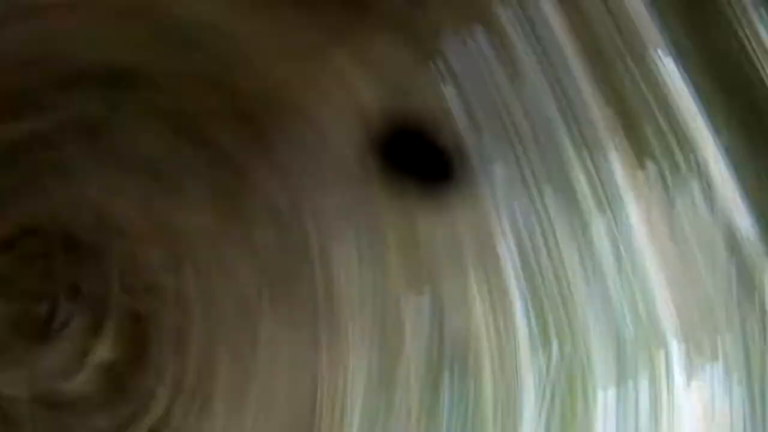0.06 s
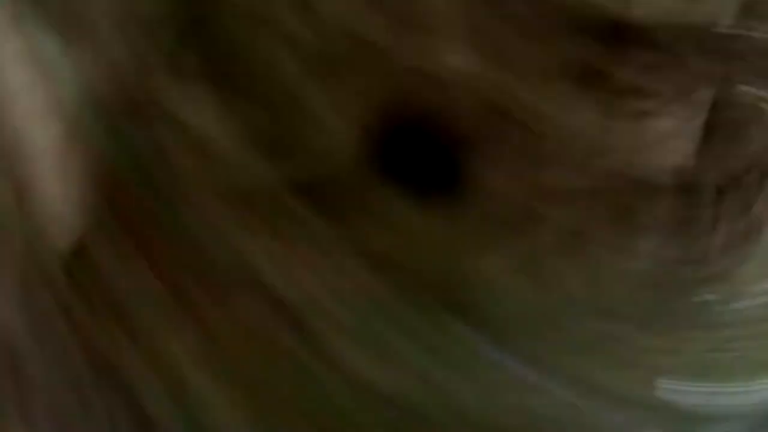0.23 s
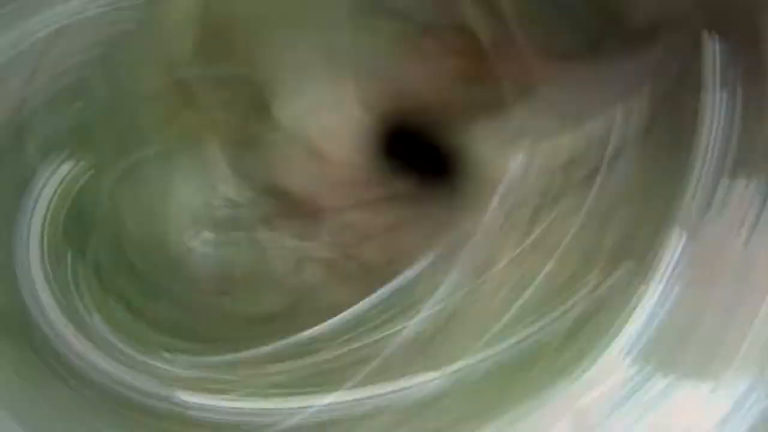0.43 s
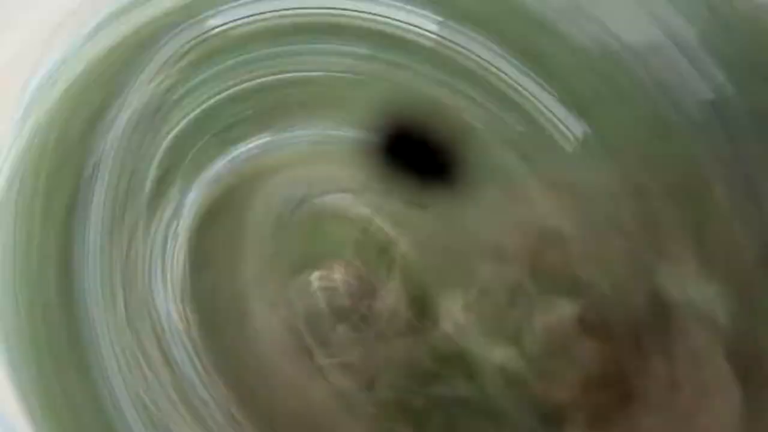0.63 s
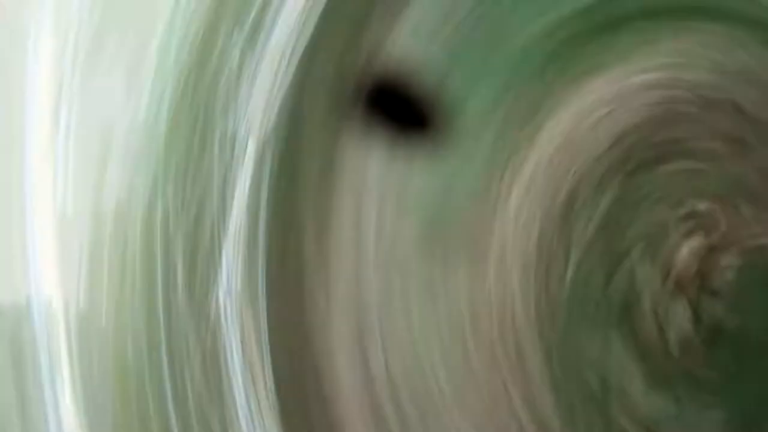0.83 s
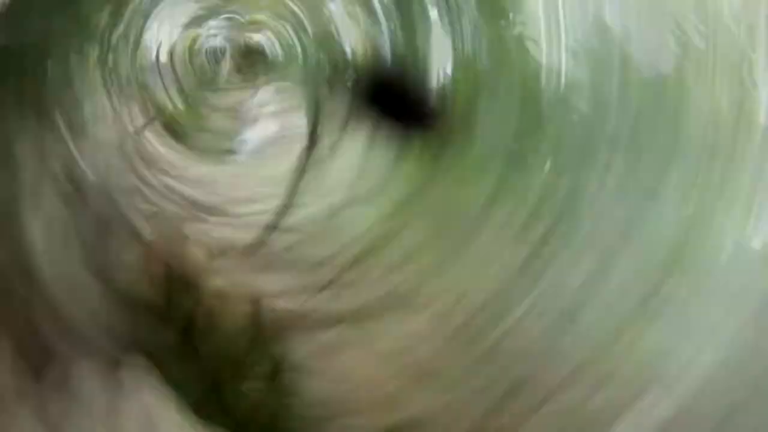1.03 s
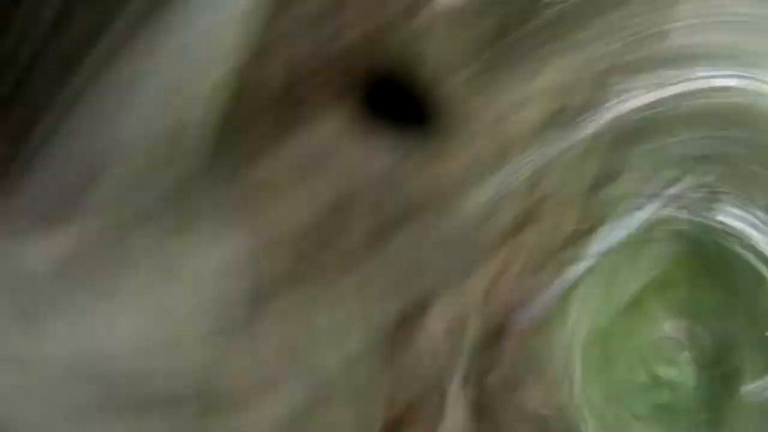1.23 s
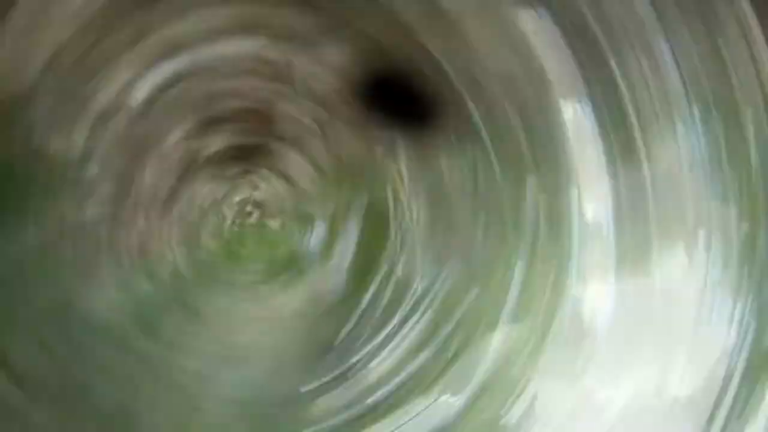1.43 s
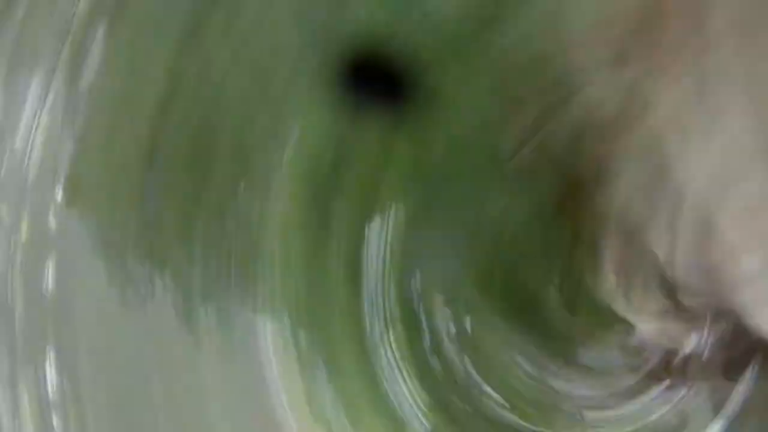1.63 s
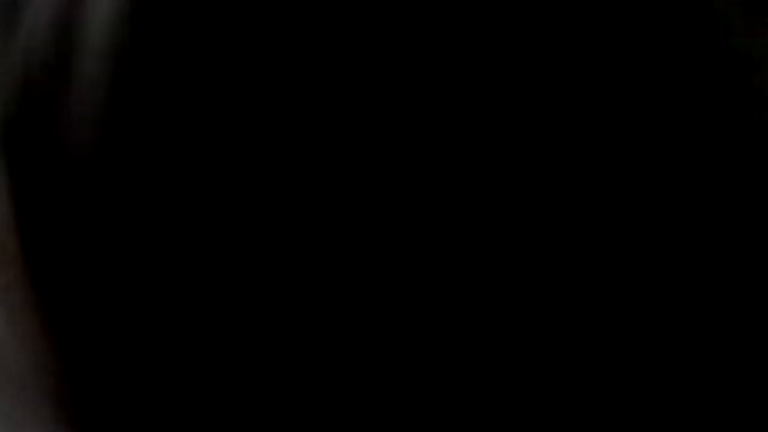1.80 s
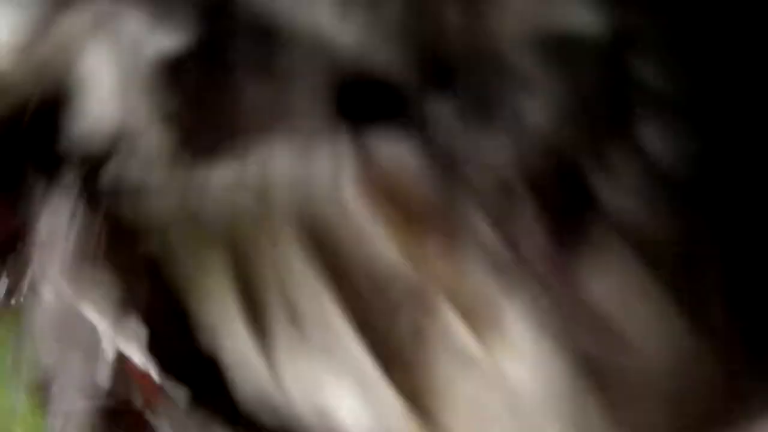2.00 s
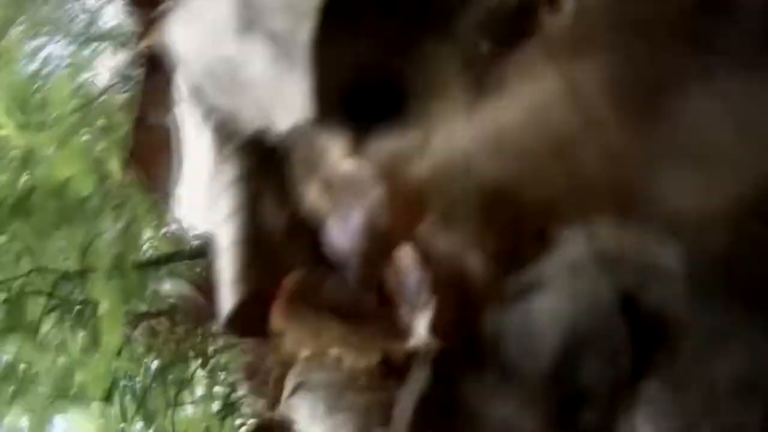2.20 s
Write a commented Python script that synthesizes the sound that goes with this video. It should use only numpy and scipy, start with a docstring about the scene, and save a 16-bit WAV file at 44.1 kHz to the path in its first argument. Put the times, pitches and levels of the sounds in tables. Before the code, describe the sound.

A small camera tumbles over dry leaves and soil, heard from its own microphone. Clusters of sharp knocks, gritty scrapes and dull thumps hit around 0.25, 0.5, 0.7 and 1 seconds, lighter near 1.25, then hard again from 1.5 to 1.7, the loudest overloading. Between them the case rings faintly and air rushes softly. From 1.8 it slides through rustling leaves, knocks twice and settles by 2.3 seconds.

```python
"""A slope of dry leaves in a quiet wood, heard from the built-in microphone of a small tumbling camera.
Each landing is right at the microphone: sharp knocks on the case, a gritty scrape and a dull thump
of earth, the hardest overloading the input. In flight the case rings faintly and air rushes softly past.
At last the camera slides through the leaf litter and settles."""
import sys
import numpy as np
from scipy import signal
from scipy.fft import rfft, irfft, next_fast_len
from scipy.io import wavfile

SR = 44100
rng = np.random.default_rng(int(sys.argv[2]) if len(sys.argv) > 2 else 0)


def store_wav(level_fs):
    """Save 16-bit WAV to argv[1]."""
    pcm = np.round(np.clip(np.atleast_2d(level_fs), -1, 1) * 32767)
    wavfile.write(sys.argv[1], SR, pcm.T.astype(np.int16))


N = 103635


def undb(db):
    """Decibels to gain."""
    return 10 ** (np.asarray(db) / 20)


def unit(x):
    """Scale to rms 1."""
    return x / np.sqrt(np.mean(x ** 2) + 1e-18)


def colour(x, outline):
    """Minimum-phase filter following an outline of frequency_hz, gain_db."""
    hz, db = np.array(outline, float).T
    size = next_fast_len(len(x) + 4096, real=True) // 2 * 2
    bins_hz = np.maximum(np.fft.rfftfreq(size, 1 / SR), 1)
    gain = undb(np.interp(np.log(bins_hz), np.log(hz), db))
    cepstrum = irfft(np.log(gain), size)
    cepstrum[1:size // 2] *= 2
    cepstrum[size // 2 + 1:] = 0
    return irfft(rfft(x, size) * np.exp(rfft(cepstrum)), size)[:len(x)]


def add(out, start_s, x):
    """Mix a sound in at a time."""
    i = int(start_s * SR)
    out[i:i + len(x)] += x[:N - i]


def fade(t, t60_s):
    """Exponential decay by 60 dB in t60_s."""
    return np.exp(-np.log(1000) * t / t60_s)


# Air at the microphone, the quiet wood behind it: frequency_hz, gain_db
AIR_SPECTRUM = [(20, 10), (45, -8), (110, -19.5), (300, -23.5), (480, -21.5), (900, -31.5), (2200, -24.5),
                (3200, -34), (5500, -33.5), (10000, -43.5), (16000, -59)]
# Its rise and fall: time_s, level_db
AIR_LEVELS = [(0, -40.5), (.2, -39), (.42, -51.5), (0.799, -51), (1.15, -48.5), (1.4, -55), (2.35, -50)]

def air():
    """Air rushes softly past the microphone of the flying camera."""
    level_db = np.interp(np.arange(N) / SR, *np.array(AIR_LEVELS).T)
    return undb(level_db) * unit(colour(rng.standard_normal(N), AIR_SPECTRUM))


# Lightly damped modes of the case around the microphone: pitch_hz, gain_db, t60_s
CASE_MODES = [(474,4.5,0.4), (684,-6.5,0.35), (860,-4,.18), (1450,-27.5,.5), (1787,-20,.35),
              (2158,-22.5,0.82), (2627,-14.5,.22), (3548,-20.5,.2), (4420,-24,.3)]
# Contacts that leave it ringing: start_s, level_db, favoured_hz
RING_CONTACTS = [(.33,-34.5,2140), (.69,-28,1193), (1.042,-49.5,494), (1.504,-30.5,480), (1.5771,-31.5,480)]

def case_ring(falloff_db_per_octave=9):
    """The case rings on in flight; modes near the pitch that the struck spot favours speak most."""
    out, t = np.zeros(N), np.arange(SR // 2) / SR
    for start_s, level_db, favoured_hz in RING_CONTACTS:
        for pitch_hz, gain_db, t60_s in CASE_MODES:
            octaves_off = abs(np.log2(pitch_hz / favoured_hz))
            gain = undb(level_db + gain_db - falloff_db_per_octave * octaves_off)
            add(out, start_s, gain * fade(t, t60_s) * np.sin(2 * np.pi * pitch_hz * t))
    return out


def grit(band_catches_per_s=1600, spread_db=2.9, smooth_gain=.6):
    """Dense tiny catches of uneven size, each in its own half-octave band, over a smooth rub."""
    grains = 0
    for low_hz in 750 * 2 ** np.arange(0, 4, .5):
        size = undb(spread_db * np.minimum(rng.exponential(size=N), 5))
        catches = (rng.random(N) < band_catches_per_s / SR) * size * rng.standard_normal(N)
        band = signal.butter(2, [low_hz, low_hz * np.sqrt(2)], "band", fs=SR, output="sos")
        grains = grains + signal.sosfilt(band, catches)
    return unit(unit(grains) + smooth_gain * rng.standard_normal(N))


# Scrapes over leaves and soil, rising and falling by 20 dB in the times given:
# peak_s, rise_s, fall_s, level_db, leaf_relative_db
SCRAPE_CONTACTS = [(0.262, 0.013, 0.022, -15, -27), (.309, 0.0094, 0.013, -20, -37),
                   (.328, 0.0077, 0.027, -30, -6.5), (0.361, 0.009, 0.026, -26.5, -14),
                   (0.473, 0.011, 0.014, -17.5, -8), (0.5, 0.025, 0.05, -20.5, -9),
                   (0.554, 0.036, 0.045, -30, -10.5), (0.67, 0.011, 0.054, -37.5, -4.5),
                   (0.834, 0.008, 0.015, -44, -27.5), (.932, 0.035, 0.024, -15.5, -20),
                   (0.954, 0.023, 0.014, -14, -32), (1.003, 0.032, 0.052, -17, -21),
                   (1.041, 0.013, 0.019, -25, 0.5), (1.216, 0.0059, 0.026, -27.5, -8.5),
                   (1.29, 0.021, 0.029, -34, -6), (1.485, 0.021, 0.024, -19.5, -10.5),
                   (1.554, 0.023, 0.015, -13.5, -29), (1.585, 0.018, 0.033, -27.5, -14),
                   (1.666, 0.036, 0.018, -12, -8.5), (1.697, 0.028, 0.074, -31, -15.5),
                   (1.88, 0.069, 0.069, -21, -10.5), (1.981, 0.27, .08, -34, -16),
                   (2.052, 0.053, 0.028, -21, -13.5), (2.132, 0.17, 0.19, -24, -12.5),
                   (2.31, 0.027, 0.062, -36, -26)]
# Rubbing, carried through the case to the microphone: frequency_hz, gain_db
RUB_SPECTRUM = [(30,6), (120,1), (330,-5), (490,3), (600,-2), (850,-7.5), (1050,-17.5), (1400,0), (1750,-5),
                (2350,-3), (3000,-18.5), (5000,-24.5), (10000,-49.5)]
# Dry leaves brushing close by: frequency_hz, gain_db
LEAF_SPECTRUM = [(1500, -3.5), (3300, 5.5), (5500, 1.5), (8000, -5), (10000, -16), (14000, -12),
                 (18000, -30.5)]

def scrapes(steepness=1.3, judder_db=1.6, judder_per_s=160):
    """Pressure swells and lets go at each contact; juddering grit drives the case and crackles leaves."""
    t, rub_power, leaf_power = np.arange(N) / SR, 0, 0
    for peak_s, rise_s, fall_s, level_db, leaf_relative_db in SCRAPE_CONTACTS:
        from_peak = np.maximum((peak_s - t) / rise_s, (t - peak_s) / fall_s)
        pressure = undb(level_db - 20 * from_peak ** steepness)
        rub_power += pressure ** 2
        leaf_power += (pressure * undb(leaf_relative_db)) ** 2
    jolts = rng.standard_normal(N // 20)
    judder = undb(judder_db * np.interp(t * judder_per_s, np.arange(len(jolts)), jolts))
    rub = np.sqrt(rub_power) * unit(colour(grit(), RUB_SPECTRUM))
    leaves = np.sqrt(leaf_power) * unit(colour(grit(), LEAF_SPECTRUM))
    return judder * (rub + leaves)


# The camera body landing on soft earth: start_s, peak_db, pitch_hz
EARTH_LANDINGS = [(0.26,-3.5,160), (0.323,-11.5,143), (0.328,-17,38.2), (0.4995,-6.5,140), (0.521,-15,27.3),
                  (0.664,-9,78.4), (0.678,3,171), (0.714,-28,55), (.925,-14.5,185), (1.044,3.5,212),
                  (1.207,-8,96), (1.2188,-2,67), (1.299,-9.5,128), (1.304,-2,57.6), (1.669,-4.5,83),
                  (1.7144,3,290), (1.899,-8.5,39.6)]

def thumps(rise_cycles=.41, sharpness=1.81, thud_db=-18):
    """The earth gives way and pushes back: a heavily damped, slowing swing with a little rough thud."""
    out, t = np.zeros(N), np.arange(SR // 5) / SR
    for start_s, peak_db, pitch_hz in EARTH_LANDINGS:
        age = pitch_hz * t / rise_cycles
        envelope = (age * np.exp(1 - age)) ** sharpness
        lowpass = signal.butter(2, 2 * pitch_hz, fs=SR, output="sos")
        thud = unit(signal.sosfilt(lowpass, rng.standard_normal(len(t))))
        swing = np.sin(2 * np.pi * np.log2(1 + pitch_hz * t))
        add(out, start_s, undb(peak_db) * envelope * (undb(thud_db) * thud - swing))
    return out


# Blows on the case, centimetres from the microphone:
# start_s, level_db, pitch_hz, hollow_trim_db, crack_trim_db, t60_s
CASE_BLOWS = [(0.2273,5,2506,-13,-9,.019), (0.23,-11.5,940,-15,-8,0.055), (.243,-4.5,1970,-20,-1,0.02),
              (.253,-1,2375,-10.5,-9,0.019), (0.2597,-7,1400,-3.5,-3,0.022), (.266,-13,1412,-12,-14,0.047),
              (0.2948,-5.5,1480,-18,-9,0.022), (0.318,-7.5,2040,-7,-9,0.019), (.325,-5,1430,-15,-13,0.022),
              (0.3452,-20,1920,-5,-5.5,.016), (0.4555,-30.5,2230,-15.5,-3,.025),
              (0.473,-2.5,883,-9.5,-8,0.021), (.5,-11,1550,0.5,-23,0.027),
              (0.5061,-6.5,2285,-19,-2.5,0.016), (0.5235,-16,1510,-17,2,0.026),
              (0.6524,-13,1560,1,-21,0.061), (.674,-15,2300,1,-3,0.015), (0.68,5,1285,4,-19,0.015),
              (0.6859,0,1933,-3,-25,0.015), (.711,-7.5,1546,-1.5,-9,0.024), (0.804,-42,1400,4,-16,0.083),
              (0.899,-0.5,2345,-33,-10.5,0.013), (0.9124,-9.5,1900,-12.5,-11,0.026),
              (0.9252,-4,1933,-34,-15,0.02), (0.9339,-6,1680,-9.5,-10,0.015),
              (0.9442,-2.5,2350,-10,-17,0.0057), (.959,-9,1660,-28,-28,0.019),
              (0.98,-18.5,1680,-7,-9.5,0.024), (1.0,-7.5,2130,-13,-3,0.015), (1.0394,-6,2406,-29,-15,0.032),
              (1.043,-9,1373,0.5,-5,0.03), (1.0486,0,1450,-2,-10.5,0.012),
              (1.2083,-12.5,2250,-19,-5.5,0.028), (1.219,-8,1400,-24.5,-9,0.028),
              (1.3009,-15.5,1907,-6,-11,0.025), (1.454,-17,2320,-13.5,-29.5,0.0091),
              (1.4804,-15,1030,-12,-1.5,0.033), (1.502,2.5,1830,-7,-17.5,0.013),
              (1.5201,-4,1810,-9,-18,0.017), (1.5245,-3,2210,-41,-10,0.019), (1.534,-8,2180,-27,-3.5,0.017),
              (1.54,-9.5,2070,-10,-8,0.014), (1.56,-16,1670,-34,0.5,0.017), (1.576,-9,1274,-5,-44,0.044),
              (1.637,-10.5,1450,-34,-7,0.025), (1.716,0.5,1470,-9,-9,.011), (1.743,-27.5,2000,2,-42,0.013),
              (1.861,-16,1910,-1.5,-23,0.025), (2.069,-4.5,2500,-11,-3.5,0.012)]
# Midrange clack of the shell: frequency_hz, gain_db
CLACK_SPECTRUM = [(500, -31), (1000, -18.5), (1400, -3.5), (1750, 0), (2350, -0.5), (2900, -11),
                  (4500, -46), (9000, -60.5)]
# Hollow lows of the case: frequency_hz, gain_db
HOLLOW_SPECTRUM = [(80, -22), (250, -3.5), (480, 1), (650, -1.5), (900, -4.5), (1300, -1), (3000, -55.5)]
# Bright crack of the impact: frequency_hz, gain_db
CRACK_SPECTRUM = [(1500, -38.5), (3300, 5.5), (5200, 2.5), (7500, -10), (10000, -21.5), (14000, -34),
                  (18000, -33)]

def knocks(attack_s=.00035, onset_s=.0027, contact_db=-3.5, clack_db=-7, hollow_db=-5, crack_db=-5.5):
    """Each blow rings the point of contact briefly, with a shell clack, hollow lows and a shorter crack."""
    def at_level(x, db):
        """Set the rms level of the onset."""
        return undb(db) * x / np.sqrt(np.mean(x[:int(onset_s * SR)] ** 2))

    out, t = np.zeros(N), np.arange(SR // 10) / SR
    for start_s, level_db, pitch_hz, hollow_trim_db, crack_trim_db, t60_s in CASE_BLOWS:
        noise = rng.standard_normal((3, len(t)))
        attack = 1 - np.exp(-t / attack_s)
        envelope = attack * fade(t, t60_s)
        crack_envelope = attack * fade(t, .73 * t60_s)
        phase = 2 * np.pi * pitch_hz * t
        modes = np.sin(phase) + undb(-11) * np.sin(.94 * phase)  # a weaker mode lies just below
        contact = at_level(envelope * modes, contact_db)
        clack = at_level(colour(noise[0] * envelope, CLACK_SPECTRUM), clack_db)
        hollow = at_level(colour(noise[1] * envelope, HOLLOW_SPECTRUM), hollow_db + hollow_trim_db)
        crack = at_level(colour(noise[2] * crack_envelope, CRACK_SPECTRUM), crack_db + crack_trim_db)
        add(out, start_s, undb(level_db) * (contact + clack + hollow + crack))
    return out


def scene(side_db=-36):
    """Every contact reaches the microphone through the one case, so left and right are nearly alike."""
    mid = knocks() + scrapes() + case_ring() + thumps() + air()
    side = undb(side_db) * knocks()
    return np.array([mid + side, mid - side])


def record(dry, ceiling=.9, knee=5, top_hz=15000):
    """The camera's input overloads on the hard blows, and the highest treble is cut."""
    clipped = dry / (1 + np.abs(dry / ceiling) ** (2 * knee)) ** (.5 / knee)
    lowpass = signal.ellip(10, .2, 90, top_hz, fs=SR, output="sos")
    return signal.sosfilt(lowpass, clipped)


dry = scene()
out = record(dry)
store_wav(out)
```